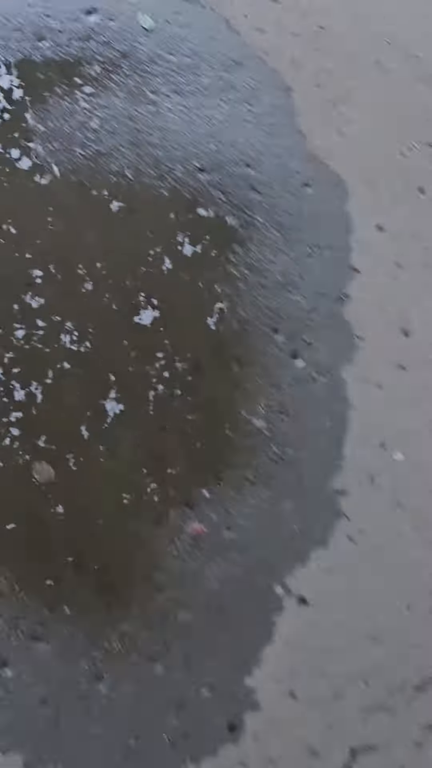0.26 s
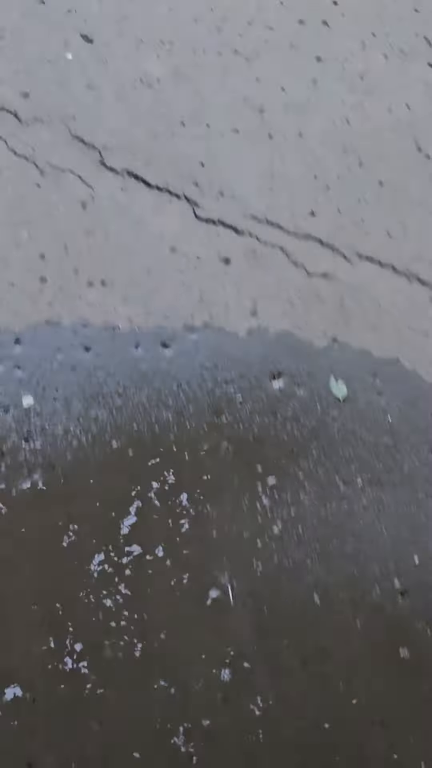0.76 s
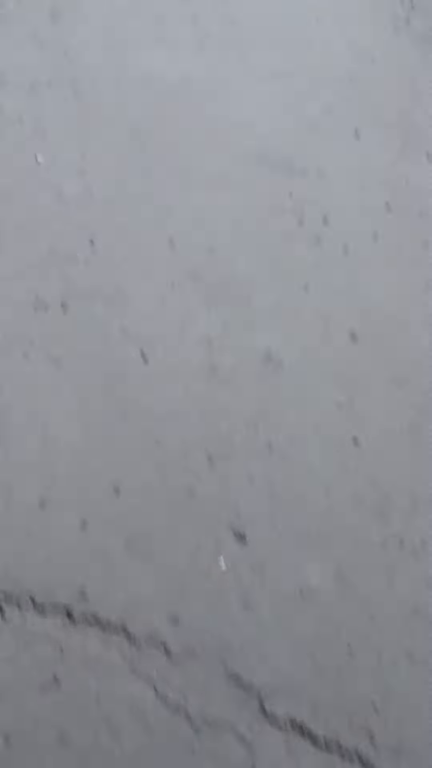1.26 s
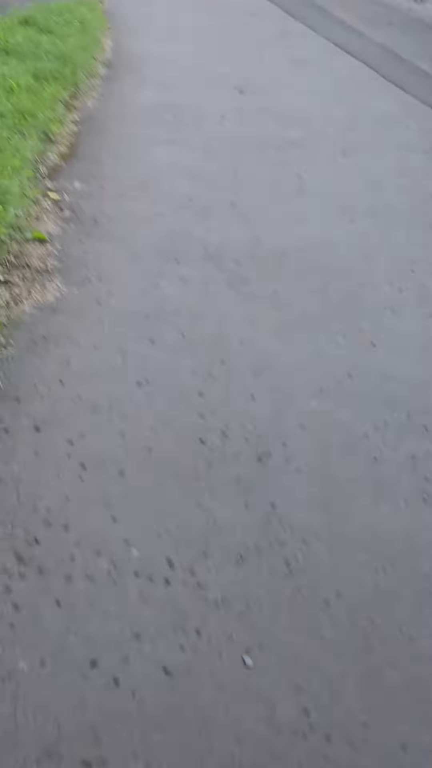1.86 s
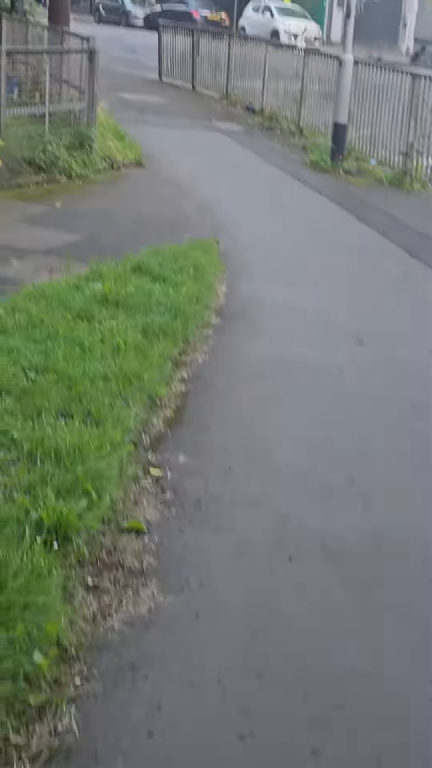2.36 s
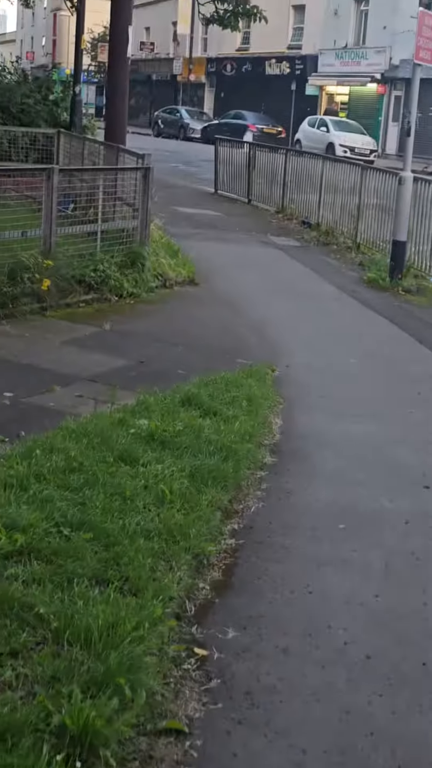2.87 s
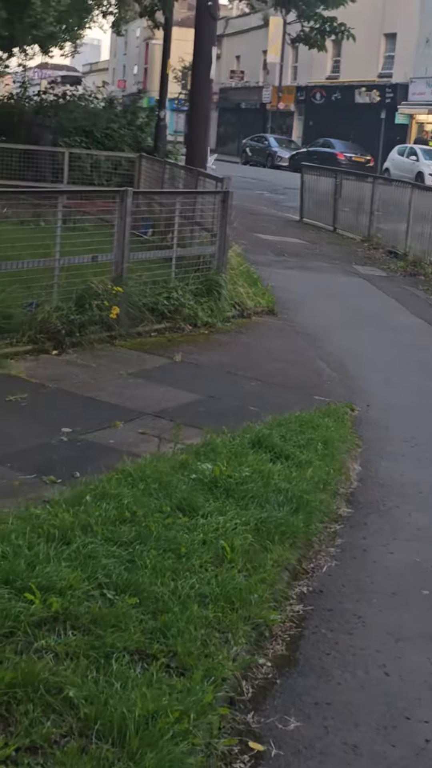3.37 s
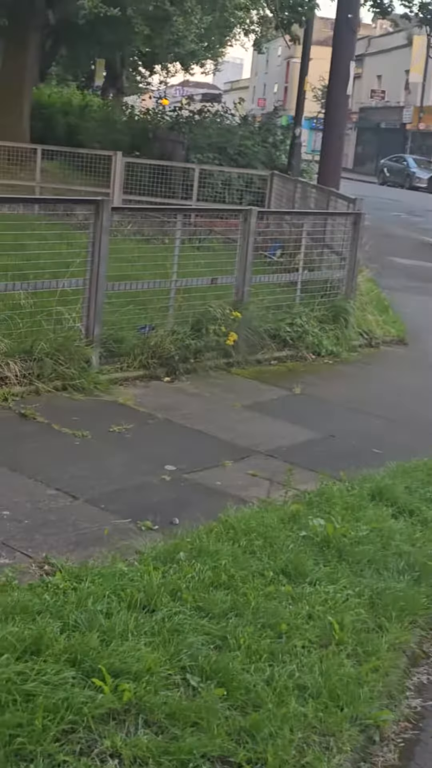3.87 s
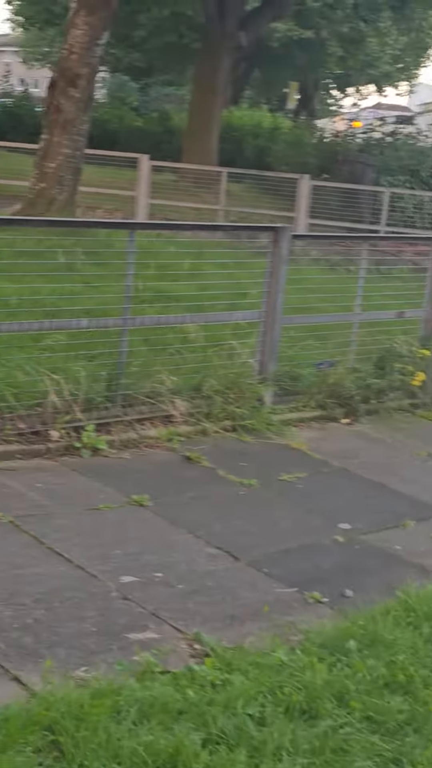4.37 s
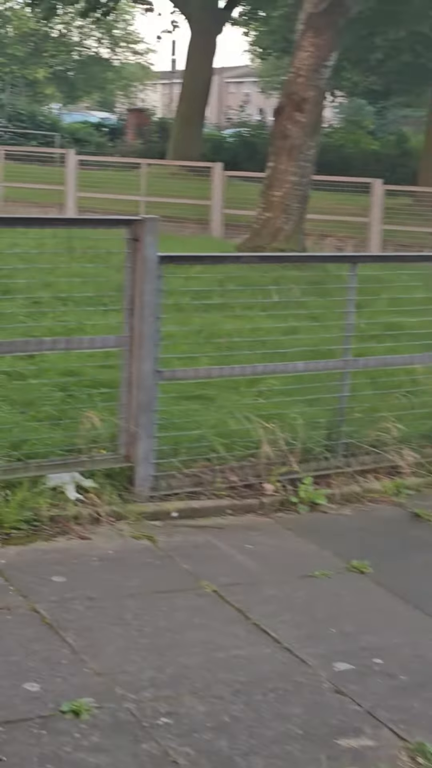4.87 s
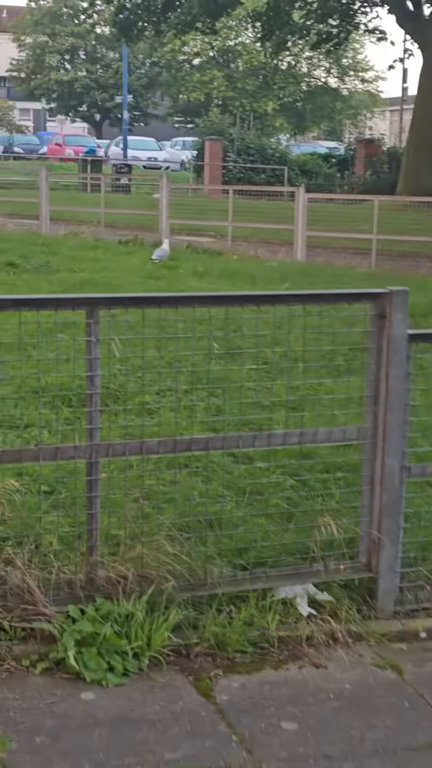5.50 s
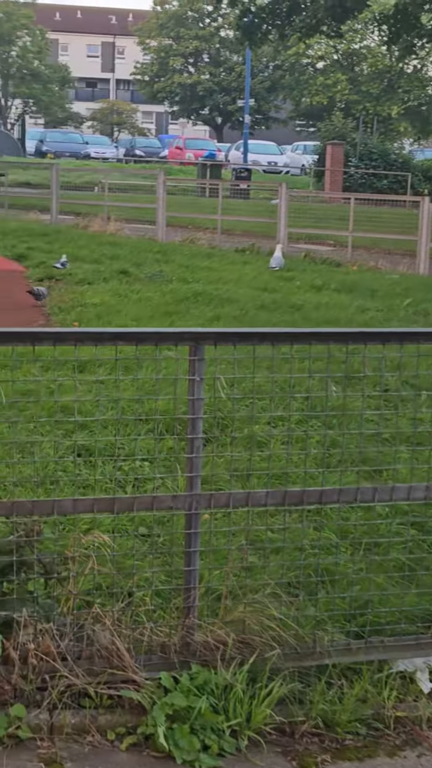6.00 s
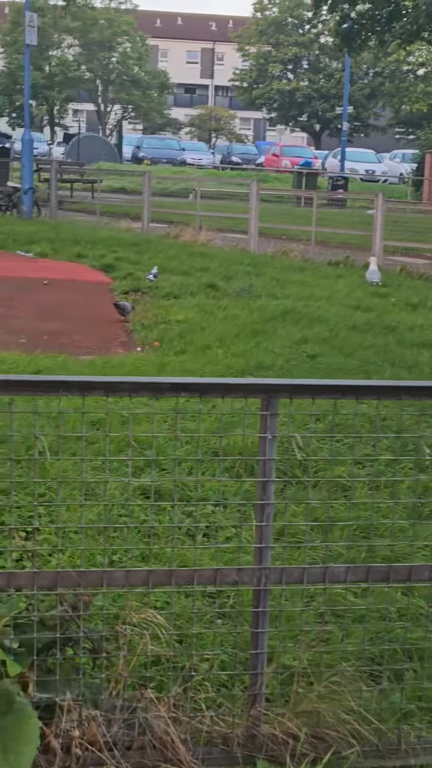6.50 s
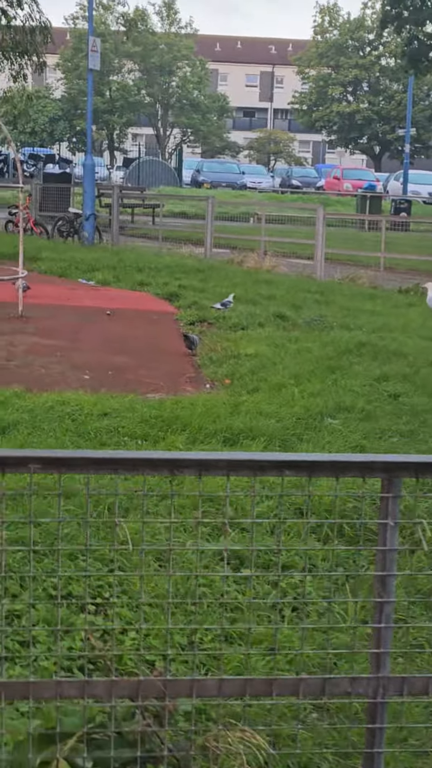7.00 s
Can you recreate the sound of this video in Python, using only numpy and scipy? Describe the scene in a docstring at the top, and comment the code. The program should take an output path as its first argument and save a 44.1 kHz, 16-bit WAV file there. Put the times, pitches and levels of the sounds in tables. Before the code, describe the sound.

An open urban green beside a street, heard through a handheld stereo microphone. Low traffic rumble runs throughout and grows louder, with soft tyre roar and a deep engine hum swelling in pulses, notably near 2.6, 5.3 and 5.7 s. A trailing gull whistle opens, then short yelps at 0.1 and 0.45 s, the second with a small scuff. Thin high whistles come at 1.2-1.6 s. From 2.3 to 3.2 s a piercing call trills and steps downward, ending in rough caws until 3.4 s. Another whistle falls at 4.2-4.6 s into two yelps and a long hoarse, throbbing caw until 5.3 s. More caws follow at 5.7-6.3 and 6.6-7.2 s, with fainter whistles around 6.1-6.5 s and a last clipped yelp at 7.15 s. Buildings return diffuse echoes. Close by, faint shoe and cloth scuffs, dull thuds at 1.3, 4.6 and 6.1 s, and a sharp tick at 5.15 s.

```python
"""Gulls over an urban green

Gulls call: stepped whistles are sines with an octave overtone, yelps are overtone stacks through a throat,
and harsh throbbing caws are rough stacks chopped by a flutter; the house fronts return scattered echoes.
Traffic rumbles ever louder as coloured noise, with sine drones of an engine under it.
A walker's shoes and clothes scuff as grainy noise and tick as resonant puffs close to the microphone."""
import sys
import numpy as np
from scipy import signal
from scipy.fft import rfft, irfft, next_fast_len
from scipy.io import wavfile

SR = 44100
rng = np.random.default_rng(int(sys.argv[2]) if len(sys.argv) > 2 else 0)


def waveform_to_disk(signal):
    """Save audio, clipped to [-1, 1], as 16-bit WAV at the path in sys.argv[1]."""
    frames = np.transpose(np.atleast_2d(signal))
    scaled = np.clip(frames, -1, 1) * 32767
    samples = np.round(scaled).astype(np.int16)
    wavfile.write(sys.argv[1], SR, samples)


N = 319725


def amp(db):
    """Decibels are logarithmic: 20 dB is a tenfold amplitude."""
    return 10 ** (np.asarray(db) / 20)


def rms_one(x):
    """Normalizes the mean power to 1."""
    return x / np.sqrt(np.mean(x ** 2) + 1e-20)


def in_time(rows):
    """Linear interpolation of a table's columns at every sample."""
    s, *columns = np.transpose(rows)
    return [np.interp(np.arange(N) / SR, s, c) for c in columns]


def at_hz(points, hz):
    """Interpolates a spectrum in dB along a logarithmic frequency axis."""
    point_hz, point_db = np.array(points)[:, 0], np.array(points)[:, 1]
    return np.interp(np.log(hz), np.log(point_hz), point_db)


def drift(rate, size):
    """Random fluctuation of rms 1: white noise through a two-pole low-pass with its corner near rate in Hz."""
    pole, run_in = np.exp(-2 * np.pi * rate / SR), SR // 4
    noise = rng.standard_normal(size + run_in)
    slow = signal.lfilter([1], [1, -2 * pole, pole * pole], noise)
    return rms_one(slow[run_in:])


def turns(hz):
    """Phase in radians is the running integral of angular frequency."""
    return 2 * np.pi * np.cumsum(hz) / SR


def panned(x, pan_db):
    """Interchannel level difference places a sound; positive is louder on the left."""
    return x * amp([[pan_db / 2], [-pan_db / 2]])


def note(start, length):
    """Time base of a note: its samples, the time since its start and its progress 0-1."""
    at = np.arange(max(round(start * SR), 0), min(round((start + length) * SR), N))
    t = at / SR - start
    return slice(at[0], at[-1] + 1), t, t / length


def envelope(t, length, attack, release):
    """Amplitude envelope with sine-squared attack and release around a hold."""
    ramp = np.minimum(t / attack, (length - t) / release)
    return np.sin(np.pi / 2 * np.clip(ramp, 0, 1)) ** 2


def wide_noise(spectrum):
    """Partly coherent stereo noise of a given spectrum: independent mid and side; the mid has rms 1."""
    # channel difference: hz, side_minus_mid_db
    width = [(60, -16), (150, -20.5), (380, -11.5), (950, -4), (2380, -2.5), (5980, 4), (15000, -1.5)]
    hz = np.maximum(np.arange(N // 2 + 1) * SR / N, 1)
    # beyond its end points the spectrum falls by 40 dB per octave
    edge_db = -40 * np.log2(np.maximum(spectrum[0][0] / hz, 1) * np.maximum(hz / spectrum[-1][0], 1))
    mid, side = rfft(rng.standard_normal((2, N))) * amp(at_hz(spectrum, hz) + edge_db)
    side = side * amp(at_hz(width, hz))
    both = irfft([mid + side, mid - side], N)
    return both / np.sqrt(np.mean(both.mean(axis=0) ** 2))


def whistles():
    """Joint amplitude and frequency modulation: trilled sines with an octave overtone and a line half-way."""
    # notes: start_s, length_s, first_hz, last_hz, first_db, last_db,
    # octave_db (relative to the fundamental), trill_depth (0-1), left_right_db
    whistled_notes = [ (-.05, 0.14, 1243, 1270, -60, -51, -17.5, 0.83, -5.5),
                      (-.05, 0.148, 3600, 3270, -54, -50.5, -45, 0.13, 6),
                      (1.178, 0.0502, 3100, 3140, -58.5, -59.5, -25, 0.8, 1),
                      (1.204, 0.069, 4120, 4300, -69, -61, -40, .11, 5),
                      (1.263, 0.18, 4142, 4102, -47, -56.5, -35, 0, 1.5),
                      (1.415, 0.056, 3580, 3560, -58, -62, -37, 0.2, -6),
                      (1.441, 0.21, 3492, 3370, -48, -61, -25, 0.11, 1),
                      (1.621, 0.22, 5580, 5700, -80, -72, -50, 0.07, 3),
                      (1.835, 0.13, 5600, 4600, -77, -80, -55, 0, 7),
                      (2.22, 0.017, 3550, 3759, -54, -59.5, -31, 0.33, -5),
                      (2.262, 0.06, 3970, 4660, -71, -63, -19, 0.3, 10),
                      (2.318, 0.11, 4080, 4215, -42.5, -55, -32, 0.13, 4),
                      (2.321, 0.15, 3586, 3740, -60, -59, -24.5, 0.4, 11),
                      (2.441, .265, 3447, 3327, -46.5, -46, -28.5, 0.14, 4),
                      (2.689, 0.2, 3350, 3323, -49.5, -43, -27.5, 0.58, 3),
                      (2.855, 0.142, 3220, 3132, -50.5, -46.5, -24, 0.95, 2),
                      (3, 0.142, 2703, 2432, -44.5, -41.5, -16.5, 0.65, .8),
                      (3.132, 0.045, 2120, 2107, -36, -52, -10, 0.23, -1.5),
                      (3.496, 0.48, 3060, 3013, -77.5, -70, -36.5, 0.9, 2),
                      (4.134, 0.052, 4500, 4240, -79, -63, -17, 0.3, 2),
                      (4.178, 0.3, 3662, 3310, -42, -46, -19.5, 0.37, 4.5),
                      (4.467, 0.181, 2607, 2533, -39.5, -48, -12, 0.36, 3),
                      (6.078, 0.07, 4022, 3985, -70, -63, -25.5, 0.39, 11),
                      (6.148, 0.1516, 3914, 3820, -53, -61.5, -23, 0.3, 7),
                      (6.249, 0.089, 3283, 3260, -52, -57, -9, 0.16, 9),
                      (6.321, 0.218, 3266, 3200, -54.5, -67, -19, 0.47, 2.5),
                      (6.648, 0.4, 1595, 1516, -47, -51, -30, 0.4, -1), ]
    # stereo phase of each note: lead of the left fundamental in radians, before the ports
    left_leads = [-2.5, 0.5, -3, -1, 1.1, 3, 2.5, -2, 2, 0, 2.5, 1.65, 0.7, 0, 3, 1.9, 1, 0, 2.5, 0, 0.5, 1,
                  2.5, 2.5, -1.2, 4, -0.3]
    trill_hz, trill_pitch_share = 25.43, 0.016
    sharp_share, settle_s = 0.008, 0.0083  # a note starts sharp and settles
    attack_s, release_s = 0.013, 0.0054
    pressed_wobble = 0.1  # pitch share per unit of octave amplitude and trill depth
    half_line_db = -17  # strong-weak cycles: central level relative to the octave, at full trill depth
    out = np.zeros((2, N))
    for row, lead in zip(whistled_notes, left_leads):
        start, length, hz0, hz1, db0, db1, octave_db, depth, pan_db = row
        span, t, along = note(start, length)
        hz = (hz0 + (hz1 - hz0) * along) * (1 + sharp_share * np.exp(-t / settle_s))
        size = len(hz)
        level = amp(db0 + (db1 - db0) * along) * envelope(t, length, attack_s, release_s)
        depth = np.clip(depth, 0, 1)
        trill = np.sin(turns(trill_hz * (1 + 0.0031 * drift(8.5, size))))
        wobble = pressed_wobble * amp(octave_db) * depth * drift(82.0, size)
        jitter = 0.0018 * drift(90, size)
        phase = turns(hz * (1 + depth * trill_pitch_share * trill + wobble + jitter))
        phase = phase + [[lead / 2], [-lead / 2]]
        half_line = depth * amp(half_line_db + 9.3 * drift(16.8, size)) * np.sin(3 * phase / 2)
        overtones = amp(octave_db) * (np.sin(2 * phase) + half_line)
        tone = np.sqrt(2) * (np.sin(phase) + overtones)
        out[:, span] += panned(level * (1 + depth * trill) * tone, pan_db)
    return out


def traffic():
    """Incoherent sum of noise bands: rumble, tyre roar and far hiss, each fluctuating on its own."""
    # levels: time_s, rumble_db, roar_db, hiss_db
    levels = [(0.0, -47, -56, -81.5), (1.92, -41, -58, -86), (7.25, -37.5, -49.5, -77)]
    # spectra: hz, relative level_db_per_hz
    rumble_spectrum = [(22, -29), (40, -3), (62, 2.5), (86, -5.5), (140, -10.5), (250, -13), (400, -24.5),
                       (900, -28)]
    roar_spectrum = [(240, -22.5), (400, -1), (515, -5.5), (671, -10.5), (1290, -5.5), (5000, -35.5),
                     (6500, -71), (11000, -120)]
    hiss_spectrum = [(3500, -15), (5000, -13), (9800, -16), (11300, -11.5), (13000, -15), (16500, -21)]
    rumble_db, roar_db, hiss_db = in_time(levels)
    rumble = amp(rumble_db + 1.88 * drift(7.8, N)) * wide_noise(rumble_spectrum)
    roar = amp(roar_db + 2.4 * drift(7.4, N)) * wide_noise(roar_spectrum)
    hiss = amp(hiss_db + 2.0 * drift(1.7, N)) * wide_noise(hiss_spectrum)
    return rumble + roar + hiss


def engine():
    """Periodic firing gives a swelling sine; the drones of other motors waver in level and fall in pitch."""
    # firing tone: time_s, firing_hz, level_db
    firing = [(0, 56, -46), (1.3, 55.8, -44.5), (2.26, 60.03, -46), (2.62, 59.8, -32.5), (2.75, 58, -58.5),
              (3.1, 55.54, -49.5), (3.2, 55.5, -37), (3.65, 54.83, -40), (3.8, 58.5, -56),
              (4.4, 56.7, -39.5), (5.29, 55.5, -32), (5.52, 56.4, -54), (5.65, 55.98, -31.5),
              (6.4, 58.2, -36.5), (6.5, 58.7, -57), (6.64, 58.62, -34.5), (7.25, 57.2, -33)]
    # other motors: first_hz, last_hz, first_db, last_db
    other_motors = [(118.8, 110, -59.5, -48), (181.3, 160, -59.5, -56.5), (229, 216, -62, -55)]
    hz, level_db = in_time(firing)
    tones = amp(level_db) * np.sin(turns(hz))
    for hz0, hz1, db0, db1 in other_motors:
        drone_level = amp(np.linspace(db0, db1, N) + 4.3 * drift(3.9, N))
        tones = tones + drone_level * np.sin(turns(np.linspace(hz0, hz1, N)))
    return panned(np.sqrt(2) * tones, 1.0)


def stack(hz, throat, rough, odd_db=0):
    """Source-filter voice of rms 1: throat-weighted overtones that roughness turns to noise, high ones first."""
    size = len(hz)
    phase = turns(hz * (1 + 0.02756 * rough * drift(15.25, size)))
    band_hz = .38 * hz.mean()
    swell_db = 2  # independent swell of each overtone at full roughness
    out = 0
    for k in range(1, int(9000 / hz.max())):
        clear = (1 - rough) ** (k * hz / 2600)  # share of power left in the clear line
        turn = k * phase + rng.uniform(0, 2 * np.pi)
        band = drift(band_hz, size) * np.sin(turn) + drift(band_hz, size) * np.cos(turn)
        level = amp(throat(k * hz) + odd_db * (k % 2) + swell_db * rough * drift(23.0, size))
        out = out + level * (np.sqrt(clear) * np.sin(turn) + np.sqrt((1 - clear) / 2) * band)
    return rms_one(out)


def yelps():
    """Frequency glides of a harmonic voice: short cries that rise, break downwards and slide on."""
    # cries: start_s, rise_s, fall_s, top_hz, last_hz, level_db (before the swell), brightness_db_per_octave
    cries = [(0.079, 0.043, 0.13, 1468, 1190, -46.5, 1), (0.454, 0.04, 0.13, 1477, 1167, -48.5, 0.5),
             (4.598, 0.0203, 0.1313, 1484, 1371, -46, 1.5), (4.85, 0.012, 0.093, 1452, 1373, -46, -2.5),
             (7.14, 0.033, 0.119, 1448, 1380, -46.5, -19)]
    # roughness of each cry (0-1)
    roughness = [.02, .03, .4, .2, .3]
    # throat response: hz, level_db
    throat_response = [(1000, 1), (1300, 12), (2000, -15), (2800, 10.5), (4100, 4), (5500, -5.5),
                       (6500, -20), (7200, -36)]
    scoop_share = 0.07  # the rise starts this share under the top
    drop_share, drop_s = .42, 0.02246  # this share of the fall comes at once, within about drop_s
    attack_s, release_s, swell_db = 0.04, 0.053, 4  # louder towards the end
    left_lag_s = 0.000266  # the sound reaches the right port first
    out = np.zeros(N)
    for (start, rise, fall, top_hz, last_hz, level_db, bright), rough in zip(cries, roughness):
        span, t, along = note(start, rise + fall)
        sudden = drop_share * np.exp(-((t - rise) / drop_s) ** 2)
        gradual = (1 - drop_share) * (1 - (t - rise) / fall)
        rising_hz = top_hz * (1 - scoop_share * (1 - t / rise) ** 2)
        falling_hz = last_hz + (top_hz - last_hz) * (sudden + gradual)
        hz = np.where(t < rise, rising_hz, falling_hz)
        level = amp(level_db + swell_db * along) * envelope(t, rise + fall, attack_s, release_s)

        def throat(f):
            """Formant filtering with a spectral tilt."""
            return at_hz(throat_response, f) + bright * np.log2(f / top_hz)

        out[span] += level * stack(hz, throat, rough)
    late = np.interp(np.arange(N) - left_lag_s * SR, np.arange(N), out)
    return panned(np.array([late, out]), 2.1)


def scuffs():
    """Stick-slip friction of shoes and cloth: grainy noise under bell-shaped strokes."""
    # strokes: peak_s, level_db (before the graininess), rise_s, fall_s, left_right_db
    strokes = [(.1, -74, 0.15, 0.17, -6), (0.458, -53.5, 0.0093, 0.045, 0), (.55, -70, 0.051, 0.075, -4),
               (1.282, -70.5, 0.14, 0.12, -3), (1.92, -72, 0.071, 0.064, -5), (2.5, -71, 0.16, 0.21, -1),
               (3.25, -67, 0.16, 0.15, 1), (3.905, -67, 0.019, 0.071, -5), (4.48, -70.5, 0.24, 0.38, -3),
               (4.9, -68.5, .062, .07, -4), (5.15, -63.5, 0.089, 0.096, -4.5),
               (5.97, -69.5, 0.13, 0.21, -5.5), (6.75, -63.5, 0.075, 0.11, -2)]
    # spectrum: hz, relative level_db_per_hz
    friction_spectrum = [(900, -26), (2000, 6.5), (4000, 2.5), (7000, -6.5), (9500, -5), (11500, -2.5),
                         (13000, -7.5), (16000, -13)]
    grains_per_s, grain_t60_s = 150, 0.033
    t, stroke = np.arange(N) / SR, np.zeros((2, N))
    for s, level_db, rise, fall, pan_db in strokes:
        bell = np.exp(-((t - s) / np.where(t < s, rise, fall)) ** 2)
        stroke += panned(amp(level_db) * bell, pan_db)
    grit = (rng.random(N) < grains_per_s / SR) * rng.exponential(0.54, N)
    grain = 1 + signal.lfilter([1], [1, -amp(-60 / (grain_t60_s * SR))], grit)
    return stroke * grain * amp(0.59 * drift(49, N)) * wide_noise(friction_spectrum)


def ticks():
    """Damped resonance: grit and footfalls are a click and dying noise through a broad band."""
    # impacts: time_s, peak_db, ring_hz, left_right_db
    impacts = [(1.27, -38, 416, -3), (1.288, -64, 3600, -3), (.26, -52, 9000, -5), (2.0, -50, 3400, -14),
               (3.889, -43, 437, -14), (3.929, -46, 6500, -3), (3.958, -51, 7900, -10),
               (4.295, -56, 7500, -5), (4.401, -43, 8000, -13), (4.62, -34.5, 496, 1),
               (5.157, -22, 2030, -2), (5.574, -60, 7940, -27), (5.824, -44.5, 7960, -14),
               (6.128, -32, 441, 2.5), (6.527, -55, 9630, -2)]
    t60_at_1khz_s, shortening = 0.061, 0.62  # power law by which higher ticks die sooner
    snap = 4.8  # height of the first click, where the noise has rms 1
    out = np.zeros((2, N))
    t = np.arange(round(.15 * SR)) / SR
    for s, peak_db, hz, pan_db in impacts:
        t60 = t60_at_1khz_s * (1000 / hz) ** shortening
        band = signal.butter(2, [hz / 1.4, hz * 1.4], "band", fs=SR, output="sos")
        click = snap * (t < .25 / hz)  # a quarter of a ring cycle
        blow = (rng.standard_normal(len(t)) + click) * amp(-60 * t / t60)
        puff = signal.sosfilt(band, blow)
        at = round(s * SR)
        out[:, at:at + len(t)] += panned(amp(peak_db) * puff / np.abs(puff).max(), pan_db)
    return out


def caws():
    """Amplitude modulation of a rough low voice: a slower flutter puts side lines around each overtone."""
    # cries: start_s, length_s, first_hz, last_hz, first_db, last_db, throat_scale (factor on resonance hz),
    # first_brightness_db_per_octave, last_brightness_db_per_octave, upper_resonance_db, odd_overtones_db,
    # left_right_db
    harsh_cries = [ (2.418, 0.15, 598.5, 580.6, -44.5, -51, 0.93, -2.5, -10, 14, 3, -0.5),
                   (3.14, 0.096, 336.7, 347.7, -36, -40, 1.44, -11, 8, -5, -12, 4.5),
                   (3.22, 0.175, 345.6, 306.3, -43, -50, 1.35, 7.5, 1.5, 6.5, -3.5, 1.5),
                   (4.72, 0.556, 369.2, 360.8, -40.5, -47, 1.054, -1.5, 1, 5, 2.5, 2.5),
                   (5.72, 0.59, 382.7, 364.8, -46.5, -43.5, 0.99, -3, 2.5, 9, 2, 3.14),
                   (6.56, .42, 310.5, 304, -49, -46.5, 1.05, -2, -4, -8, -0.5, 0),
                   (6.849, 0.378, 376, 378.3, -43.5, -41.5, 0.91, 0, 3, 8, 4.5, 0), ]
    # roughness of each cry: start (0-1), end (0-1)
    roughness = [(.5, .8), (.03, .35), (.6, .9), (.4, .8), (.35, .85), (.7, .7), (.4, .7)]
    # throat response: hz, level_db
    throat_response = [(500, -22.5), (730, -1.5), (1100, 3), (1450, 5), (1880, 8.5), (2450, -2.5),
                       (2920, -3), (4300, -43), (6000, -24), (9000, -27)]
    throb_hz, throb_depth = 56.92, 0.42
    sharp_share, settle_s = 0.0303, 0.01986  # a caw starts sharp and settles
    attack_s, release_s = 0.031, 0.069
    upper_hz, upper_width_hz = 2960, 127  # a high resonance that each caw opens more or less
    out = np.zeros((2, N))
    for row, (rough0, rough1) in zip(harsh_cries, roughness):
        start, length, hz0, hz1, db0, db1, scale, bright0, bright1, upper_db, odd_db, pan_db = row
        span, t, along = note(start, length)
        hz = (hz0 + (hz1 - hz0) * along) * (1 + sharp_share * np.exp(-t / settle_s))
        level = amp(db0 + (db1 - db0) * along) * envelope(t, length, attack_s, release_s)
        bright = bright0 + (bright1 - bright0) * along

        def throat(f):
            """Formant filtering with a changing tilt and a narrow upper resonance."""
            tilt_db = bright * np.log2(np.minimum(f, 3200) / 1900)
            peak_db = upper_db * np.exp(-((f - upper_hz) / upper_width_hz) ** 2)
            return at_hz(throat_response, f / scale) + tilt_db + peak_db

        flutter = np.cos(turns(throb_hz * (1 + 0.036 * drift(3.1, len(hz)))))
        rough = rough0 + (rough1 - rough0) * np.sqrt(along)
        voice = stack(hz, throat, rough, odd_db) * (1 + throb_depth * flutter)
        out[:, span] += panned(level * rms_one(voice), pan_db)
    return out


def green(x):
    """Diffuse reverberation: convolution with dulled, exponentially decaying noise stands for the echoes."""
    t60_s, dull_hz, onset_s = 0.74, 4500, 0.032
    t = np.arange(round(1.6 * SR)) / SR
    onset = np.clip(t / onset_s, 0, 1)
    scatter = rng.standard_normal((2, len(t))) * amp(-60 * t / t60_s) * onset
    scatter = signal.sosfilt(signal.butter(4, dull_hz, fs=SR, output="sos"), scatter)
    unit_energy = scatter / np.sqrt(np.sum(scatter ** 2) / 2)
    return signal.fftconvolve(x, unit_energy, axes=1)[:, :N]


def scene():
    """Linear superposition of birds, their echoes, the walker and the street."""
    clear, cries, harsh = whistles(), yelps(), caws()
    echoes = green(amp(-8.5) * clear + amp(-6.0) * cries + amp(-5) * harsh)
    birds = clear + cries + harsh + echoes
    return birds + scuffs() + ticks() + traffic() + engine()


def record(dry):
    """Interchannel level and phase differences of two microphone ports, then a steep low-pass."""
    # ports: hz, left_lead_radians, left_right_db
    ports = [(497, 0.078, 0), (1210, 0.42, -3), (1470, 1.75, -3.5), (2150, 0.78, -8.5), (2653, 3.43, 0),
             (3510, 4.54, -5), (4300, 6.17, 0)]
    cutoff_hz = 16100  # 60 dB down from here
    pad = SR // 10
    size = next_fast_len(N + 2 * pad)
    hz = np.arange(size // 2 + 1) * SR / size
    port_hz, lead, pan_db = np.transpose(ports)
    gain = amp(np.interp(hz, port_hz, pan_db) / 2)
    left = gain * np.exp(.5j * np.interp(hz, port_hz, lead, left=0))
    padded = np.pad(dry, ((0, 0), (pad, pad)), "reflect")
    heard = irfft(rfft(padded, size) * [left, 1 / left], size)
    low_pass = signal.cheby2(24, 60, cutoff_hz, fs=SR, output="sos")
    return signal.sosfilt(low_pass, heard)[:, pad:pad + N]


dry = scene()
out = record(dry)
waveform_to_disk(out)
```